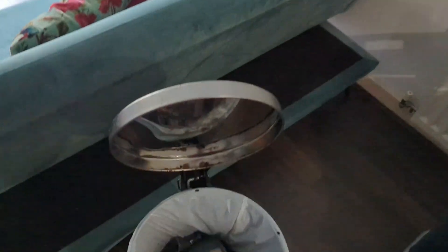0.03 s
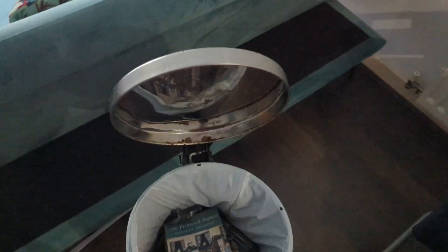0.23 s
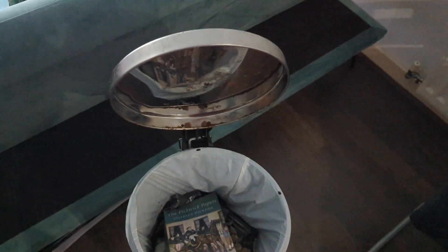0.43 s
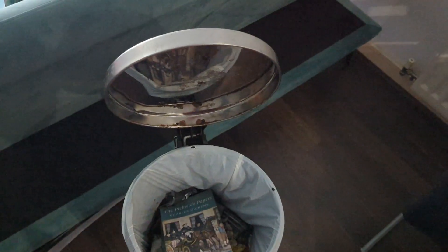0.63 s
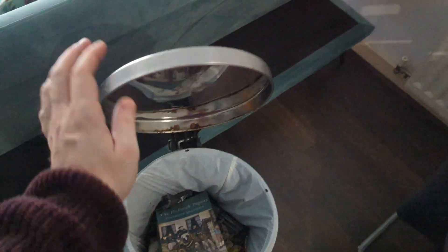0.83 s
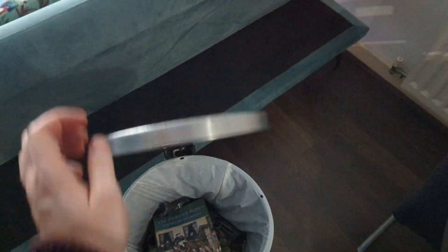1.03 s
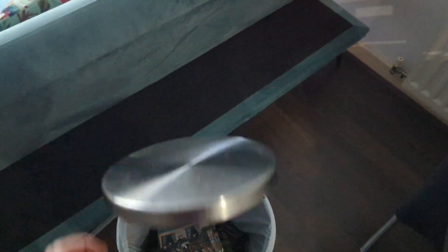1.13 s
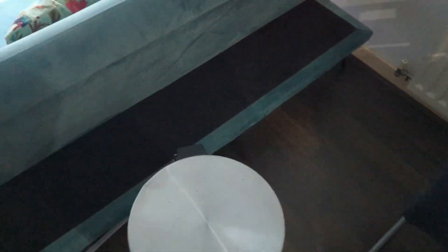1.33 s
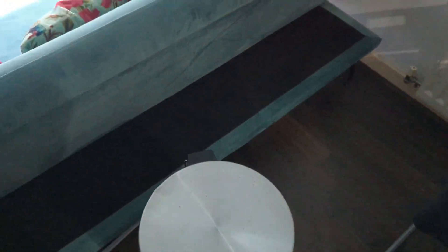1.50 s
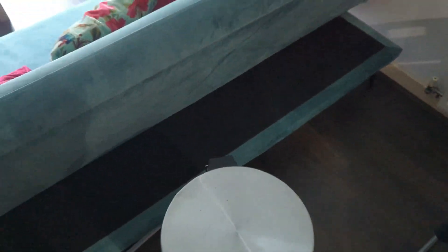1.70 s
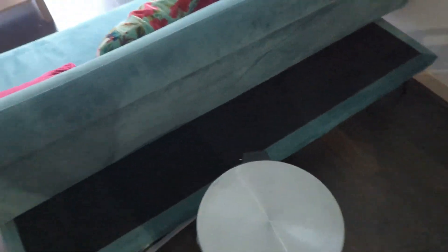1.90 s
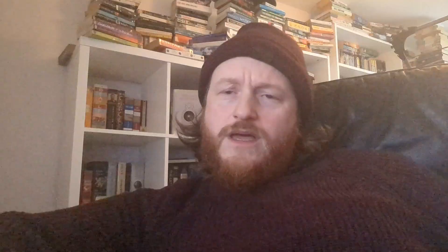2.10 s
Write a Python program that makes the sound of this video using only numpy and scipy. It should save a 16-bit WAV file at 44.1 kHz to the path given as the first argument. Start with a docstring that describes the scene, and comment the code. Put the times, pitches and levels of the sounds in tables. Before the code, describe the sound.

A book hits a lined steel pedal bin immediately, with a cluster of thuds, knocks, liner crackle and short hollow ringing over 0.2 s; faint settling knocks last until 0.56. Soft scuffs, a rustle and sharp ticks come at 0.7-0.87. At 1.3 the lid slams, clanging, juddering and ringing metallically. At 1.96 a dull pop, mostly right, cuts to silence, then faint room air from 2.06.

```python
"""Over faint room air, a book drops into a lined steel pedal bin with a rustle, thuds, knocks and clacks.
Smaller knocks follow as it settles; noise bursts and pushes make the hits, fading sines make the steel ring.
Then the lid scuffs, with a short rustle of random grains and a few sharp ticks.
It slams shut: noise clangs, many sines ring on, and the bin judders on the floor in a living room.
Near the end a smooth pulse makes a dull pop, everything else drops out, and only softer air returns."""
import sys
import numpy as np
from scipy import signal
from scipy.fft import rfft, irfft
from scipy.io import wavfile
from scipy.ndimage import uniform_filter1d

SR = 44100
rng = np.random.default_rng(int(sys.argv[2]) if len(sys.argv) > 2 else 0)


def dump_mix(stems):
    """Bounce the given channels to the path in sys.argv[1] as a 16-bit WAV at rate SR."""
    frames = np.atleast_2d(stems).T  # one column per channel
    limited = np.clip(frames, -1, 1)  # hard clip at full scale
    pcm = np.round(limited * 32767).astype(np.int16)
    wavfile.write(sys.argv[1], SR, pcm)


N = 94815
TIME = np.arange(N) / SR  # seconds

# low rumble, hum and hiss of the room: (frequency [Hz], level [dB])
AIR_COLOUR = [(18, -40), (45, -6), (120, -5), (270, -19), (400, -13.5), (2000, -29), (15000, -36.5)]
AIR_DB = -68

# rustles of plastic and cloth: (start [s], rise [s], fall [s], level [dB])
RUSTLES = [(-.012, .0055, 0.097, -33.5), (0.76, 0.057, 0.11, -49), (1.246, 0.0031, 0.044, -55)]
# colour of the rustles: (frequency [Hz], level [dB])
RUSTLE_COLOUR = [(40, -13.5), (280, -7.5), (1100, -7), (2300, -2), (3800, -12.5), (5200, -10.5),
                 (16000, -29.5)]
GRAINS_PER_S, GRAIN_SPREAD_DB, RUSTLE_WET_DB = 2600, 1.5, 2.5
# notes of the open lid, stirred by rustles and ticks: (frequency [Hz], level [dB])
OPEN_LID_MODES = [(1650, -2.5), (1800, -2.5), (2570, -4)]
OPEN_LID_DB, OPEN_LID_T60_S = -12.5, 0.15  # T60 is the time to fade by 60 dB

# the book hitting the bin: (time [s], thud [dB], knock [dB], crack of the liner [dB])
BOOK_HITS = [(.0028, -26.5, -23, -47.5), (.008, -38.5, -30.5, -52), (0.037, -61, -23.5, -29.5),
             (.043, -27, -21, -26.5), (0.0563, -27.5, -28, -34.5), (0.064, -34.5, -29.5, -29),
             (0.088, -36.5, -38, -48), (0.098, -37.5, -36.5, -41), (0.1068, -43.5, -38.5, -47),
             (0.118, -49, -41.5, -30.5), (.136, -56, -40.5, -39.5), (0.1422, -39.5, -35.5, -55),
             (.167, -36, -45, -61), (.205, -55.5, -46, -44.5), (.348, -50, -54, -72),
             (.398, -56.5, -55.5, -66.5), (.451, -72, -66.5, -65.5), (.56, -68, -68.5, -79)]
# colour of the low thud: (frequency [Hz], level [dB])
THUD_COLOUR = [(30, -27), (70, -9), (250, -3.5), (450, -7), (700, -21), (2000, -55)]
# colour of the knock: (frequency [Hz], level [dB])
KNOCK_COLOUR = [(150, -17.5), (450, -7), (1200, -3), (2800, -4), (3800, -16.5), (8000, -42)]
# colour of the liner's crack: (frequency [Hz], level [dB])
CRACK_COLOUR = [(1000, -29), (5000, -1.5), (8300, -1), (13000, -7)]
# notes of the open bin: (frequency [Hz], level [dB])
OPEN_BIN_MODES = [(229, 3), (270, 2.5), (455, -6), (556, -6.5), (1076, -5), (1265, -6.5), (2331, -5),
                  (2628, -7.5)]
OPEN_BIN_DB, OPEN_BIN_T60_S = -5, 0.3
BOOK_CONTACT_S, BOOK_WET_DB = 0.0014, -6
PUSH_DB, PUSH_HZ, PUSH_S = -32.5, 74, 0.021  # air pushed out of the bin

# low notes of the bin's wall as the book lands and leans on it: (time [s], frequency [Hz], level [dB])
BOOMS = [(.041, 229.5, -17), (.128, 269.3, -31.5), (.226, 268.4, -42), (.345, 281.5, -46.5)]
BOOM_RISE_S, BOOM_T60_S = 0.004, 0.18

# pitched clacks of the steel: (time [s], frequency [Hz], level [dB])
CLACKS = [(0.0654, 1780, -28), (0.144, 1563, -33.5), (.397, 1750, -56.5), (.556, 2250, -70),
          (0.761, 1667, -56), (1.667, 2100, -58)]
CLACK_T60_S = 0.0097

# dull scuffs as the lid is nudged, swings and settles: (time [s], level [dB], contact [s])
SCUFFS = [(.699, -66.5, 0.017), (.74, -57, 0.01), (.758, -49.5, 0.0066), (1.038, -62, 0.0052),
          (1.19, -55, 0.0047), (1.206, -55.5, 0.0065)]
# colour of the scuffs: (frequency [Hz], level [dB])
SCUFF_COLOUR = [(100, -9), (350, -2), (900, -6.5), (1900, -2.5), (3800, -18.5), (12000, -32.5)]

# small sharp ticks: (time [s], level [dB])
TICKS = [(0.791, -57.5), (0.8152, -72), (0.8505, -44.5), (0.861, -46.5), (1.2492, -56.5)]
# colour of the ticks: (frequency [Hz], level [dB])
TICK_COLOUR = [(2000, -31), (7500, 1.5), (12000, -11.5), (15000, -10.5)]
TICK_CONTACT_S, TICK_WET_DB = 0.00086, -8

# first touch, slam and rebound of the lid: (time [s], clang [dB], thump [dB], contact [s])
LID_HITS = [(1.282, -48.5, -51, 0.0033), (1.3006, -32, -32.5, 0.0021), (1.305, -27, -40, 0.0051),
            (1.322, -43, -41.5, 0.0045)]
# colour of the clang: (frequency [Hz], level [dB])
CLANG_COLOUR = [(60, -17.5), (420, 7), (700, -1.5), (1100, 0.5), (2600, -6), (4100, -14), (4950, -10),
                (9000, -16), (16000, -30)]
# colour of the thump: (frequency [Hz], level [dB])
THUMP_COLOUR = [(20, -31), (45, -1), (80, 2.5), (125, -5), (400, -8.5), (1200, -43.5)]
CLANG_WET_DB, THUMP_WET_DB = 0.5, -5

# notes of the shut bin and its lid: (frequency [Hz], level [dB], T60 [s])
SHUT_LID_MODES = [(151, -21, 3), (176.6, 0.5, 0.79), (382, -3, 0.86), (442.6, -1.5, 0.72),
                  (586, -10.5, 1.29), (709, -19, 2.2), (772, -6.5, 0.78), (861, -26, 1.45), (970, -5, 0.82),
                  (1073, -9, 1.05), (1178, -10.5, 1.08), (1581, -21, 0.77), (1622, -17.5, 1.6),
                  (1810, -20.5, 1.94), (1785, -13, 1.64), (1977, -10.5, 1), (2106, -7.5, 0.92),
                  (2244, -14.5, 1.6), (2580, -11.5, 0.92), (2600, -10.5, 1.1)]
# colour of the steel's dense shimmer of notes: (frequency [Hz], level [dB])
SHIMMER_COLOUR = [(150, -12.5), (400, -2.5), (2600, -1), (3800, -11), (16000, -48)]
# how long the shimmer rings: (frequency [Hz], T60 [s])
SHIMMER_T60 = [(300, 1.583), (2800, 1.23), (12000, 0.54)]
SHUT_LID_DB, SHIMMER_DB = -28, -38

# bumps of the bin on the floor, each a little weaker
JUDDER_S, JUDDER_HZ, JUDDER_DB, JUDDER_STEP_DB, JUDDER_COUNT = 1.3205, 43.78, -27.5, -4.5, 6

POP_S, POP_WIDTH_S, POP_DB, POP_LEAN_DB = 1.9616, 0.00019, -37.5, 25.5  # lean: right minus left
DROPOUT_S, RETURN_S, RETURN_DB = 1.963, 2.062, -5.5

# how long the room echoes: (frequency [Hz], T60 [s])
ROOM_T60 = [(80, 0.74), (250, 0.5785), (14000, 0.46)]
# how alike left and right are: (frequency [Hz], likeness [0-1])
LIKENESS = [(300, 0.93), (1600, 0.41), (5000, 0.033)]
# how far the bin leans to the right: (frequency [Hz], right minus left [dB])
BALANCE = [(400, 0.84), (1300, 3.6), (2800, 3.2), (5500, 0.89)]
ECHO_BUILD_S = 0.0013

KNEE_DB, SUPPRESS_DB, EDGE_HZ = -85.5, -6, 15850  # noise suppressor and top edge of the treble


def amp(db):
    """Turns decibels into gain."""
    return 10 ** (np.asarray(db) / 20)


def unit(x):
    """Scales each channel to an energy of one."""
    return x / np.sqrt(np.sum(x ** 2, -1, keepdims=True) + 1e-20)


def read(points, hz):
    """Reads a table's value at a frequency, with frequency on a log scale."""
    f, value = np.transpose(points)
    return np.interp(np.log(hz + 1), np.log(f), value)


def convolve(x, response):
    """Lets every moment of a sound set off a response, cut to the scene's length."""
    return signal.fftconvolve(np.atleast_2d(x), np.atleast_2d(response), axes=1)[:, :N]


def colour(x, spectrum, size=8192):
    """Filters a sound to a table's colour, without sounding ahead of it."""
    hz = abs(np.fft.fftfreq(size, 1 / SR))
    log_gain = np.log(amp(read(spectrum, hz)))
    # this phase packs the response's energy as early as possible
    response = np.fft.ifft(np.exp(np.conj(signal.hilbert(log_gain)))).real
    return convolve(x, unit(response[:size // 2]))


def pair(x):
    """Blends two unrelated channels: alike in the bass, apart in the treble."""
    left, other = rfft(x)
    same = np.clip(read(LIKENESS, np.fft.rfftfreq(N, 1 / SR)), -1, 1)
    right = same * left + np.sqrt(1 - same ** 2) * other
    return irfft(np.array([left, right]), N)


def spikes(times, levels_db):
    """Makes one clean push for each blow; levels are rms over 10 ms."""
    out = np.zeros(N)
    out[np.round(times * SR).astype(int)] = amp(levels_db) * np.sqrt(SR / 100)
    return out


def blows(times, levels_db, contacts):
    """Makes each blow a rough burst that swells and dies over its contact time."""
    out = np.zeros((2, N))
    t = TIME[:4096]
    for s, db, contact in zip(times, levels_db, contacts):
        swell = t * np.exp(-t / contact)
        spectrum = rfft(rng.standard_normal((2, len(t))) * swell)
        # even out the strong and weak frequencies by half
        burst = unit(irfft(spectrum / np.sqrt(abs(spectrum) + 1e-20)))
        start = round(s * SR)
        out[:, start:start + len(t)] += amp(db) * np.sqrt(SR / 100) * burst
    return pair(out)


def ring(modes, t60):
    """Adds one sine for each note of a struck object; all die together."""
    return unit(sum(amp(db - 60 * TIME / t60) * np.sin(2 * np.pi * hz * TIME) for hz, db in modes))


def tail(t60s, build_s):
    """Shapes noise into a dense tail, each band dying at its own speed."""
    hz, t, bands = signal.stft(pair(rng.standard_normal((2, N))), SR, nperseg=512)
    fade = amp(-60 * t / read(t60s, hz)[:, None])
    echoes = signal.istft(bands * fade, SR, nperseg=512)[1][:, :N]
    return unit(echoes * (1 - np.exp(-TIME / build_s)))


def in_room(x, wet_db):
    """Adds the room's echoes to a sound."""
    return x + amp(wet_db) * convolve(x, tail(ROOM_T60, ECHO_BUILD_S))


def air():
    """Steady coloured noise gives the room's low rumble and faint hiss."""
    return amp(AIR_DB) * colour(pair(rng.standard_normal((2, N))), AIR_COLOUR)


def open_lid_ring(x):
    """The open lid rings faintly when a sound stirs it."""
    return amp(OPEN_LID_DB) * convolve(x, ring(OPEN_LID_MODES, OPEN_LID_T60_S))


def rustle():
    """Plastic and cloth crinkle in many tiny random grains, which swell and fade together."""
    swell = np.zeros(N)
    for s, rise, fall, db in RUSTLES:
        swell += amp(db) * np.interp(TIME, [s, s + rise, s + rise + fall], [0, 1, 0])
    sizes = amp(GRAIN_SPREAD_DB * np.minimum(rng.exponential(1, N), 4))
    present = rng.random(N) < GRAINS_PER_S / SR
    grains = pair(unit(sizes * present * rng.standard_normal((2, N)))) * np.sqrt(N)
    crinkles = colour(grains * swell, RUSTLE_COLOUR)
    return in_room(crinkles, RUSTLE_WET_DB) + open_lid_ring(crinkles)


def book():
    """Each hit thuds, knocks and cracks the liner; the bin rings and the fall pushes air out of it."""
    s, thud_db, knock_db, crack_db = np.transpose(BOOK_HITS)
    contact = np.full(len(s), BOOK_CONTACT_S)
    weight = spikes(s, thud_db)
    thuds = colour(weight, THUD_COLOUR)
    knocks = colour(blows(s, knock_db, contact), KNOCK_COLOUR)
    cracks = colour(blows(s, crack_db, contact), CRACK_COLOUR)
    bin_ring = amp(OPEN_BIN_DB) * convolve(weight, ring(OPEN_BIN_MODES, OPEN_BIN_T60_S))
    cycles = (TIME - PUSH_S) * PUSH_HZ
    air_push = amp(PUSH_DB) * np.cos(2 * np.pi * cycles) * np.exp(-cycles ** 2)
    return in_room(thuds + knocks + cracks, BOOK_WET_DB) + bin_ring + air_push


def booms():
    """The thin wall flexes and each time sounds one low note."""
    swell = 1 - np.exp(-TIME / BOOM_RISE_S)
    out = np.zeros((1, N))
    for s, hz, db in BOOMS:
        note = unit(swell * ring([(hz, db)], BOOM_T60_S))
        out += convolve(spikes(np.array(s), db), note)
    return out


def clacks():
    """Chattering contacts each ring the steel briefly in a narrow band."""
    out = np.zeros((2, N))
    for s, hz, db in CLACKS:
        clack = convolve(blows([s], [0], [BOOK_CONTACT_S]), ring([(hz, 0)], CLACK_T60_S))
        out += amp(db) * np.sqrt(SR / 100) * unit(clack)
    return in_room(out, BOOK_WET_DB)


def scuffs():
    """The moving lid rubs in dull bursts of noise."""
    return in_room(colour(blows(*np.transpose(SCUFFS)), SCUFF_COLOUR), RUSTLE_WET_DB)


def ticks():
    """Very short contacts make sharp ticks and stir the open lid."""
    s, db = np.transpose(TICKS)
    sharp = colour(blows(s, db, np.full(len(s), TICK_CONTACT_S)), TICK_COLOUR)
    return in_room(sharp, TICK_WET_DB) + open_lid_ring(sharp)


def lid_slam():
    """The rim lands unevenly, so the steel clangs and thumps several times."""
    s, clang_db, thump_db, contact = np.transpose(LID_HITS)
    clang = colour(blows(s, clang_db, contact), CLANG_COLOUR)
    thump = colour(spikes(s, thump_db), THUMP_COLOUR)
    return in_room(clang, CLANG_WET_DB) + in_room(thump, THUMP_WET_DB)


def lid_ring():
    """The hardest blow sets off the lid's notes and a dense shimmer of many more."""
    notes = np.zeros((2, N))
    for hz, db, t60 in SHUT_LID_MODES:
        # higher notes reach the two ears more out of step
        phase = rng.uniform(-np.pi, np.pi, size=(2, 1)) * (1 - read(LIKENESS, hz))
        notes += amp(db - 60 * TIME / t60) * np.sin(2 * np.pi * hz * TIME + phase)
    shimmer = colour(tail(SHIMMER_T60, ECHO_BUILD_S), SHIMMER_COLOUR)
    ringing = amp(SHUT_LID_DB) * unit(notes) + amp(SHIMMER_DB) * shimmer
    s, clang_db = np.transpose(LID_HITS)[:2]
    return convolve(spikes(s[np.argmax(clang_db)], 0), ringing)


def judder():
    """The bin bumps on the floor at a steady rate, each thump weaker than the last."""
    bump = np.arange(JUDDER_COUNT)
    pushes = spikes(JUDDER_S + bump / JUDDER_HZ, JUDDER_DB + JUDDER_STEP_DB * bump)
    return in_room(colour(pushes, THUMP_COLOUR), THUMP_WET_DB)


def pop():
    """One smooth bell-shaped pulse makes a dull pop, mostly on the right."""
    level = amp(POP_DB + POP_LEAN_DB * np.array([[-.5], [.5]]))
    return level * np.exp(-.5 * ((TIME - POP_S) / POP_WIDTH_S) ** 2)


def scene():
    """The bin stands a little to the right; after the pop only the room's air returns."""
    lid_sounds = scuffs() + ticks() + lid_slam() + lid_ring() + judder()
    bin_sounds = rustle() + book() + booms() + clacks() + lid_sounds
    lean_db = read(BALANCE, np.fft.rfftfreq(N, 1 / SR)) * np.array([[-.5], [.5]])
    placed = irfft(rfft(bin_sounds) * amp(lean_db), N)
    before = TIME < DROPOUT_S
    air_gain = before + amp(RETURN_DB) * (TIME > RETURN_S)
    return placed * before + air() * air_gain + pop()


def record(dry):
    """A noise suppressor turns faint bands down; then a filter removes the highest treble."""
    bands = signal.stft(dry, nperseg=512)[2]
    power = (abs(bands) ** 2).mean(0)
    power = uniform_filter1d(power, size=9, axis=0)  # smooth over frequency
    power = abs(uniform_filter1d(power, size=5, axis=1))  # smooth over time
    gain = amp(SUPPRESS_DB / (1 + power / amp(KNEE_DB) ** 2))
    quiet = signal.istft(bands * gain, nperseg=512)[1][:, :N]
    low_pass = signal.firwin(511, EDGE_HZ, window=("kaiser", 9), fs=SR)
    return signal.oaconvolve(quiet, low_pass[None], "same")


dry = scene()
out = record(dry)
dump_mix(out)
```